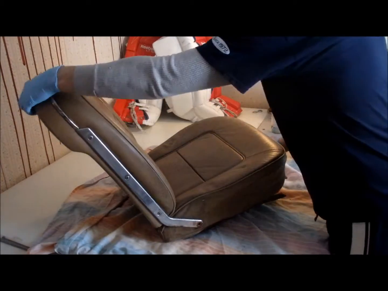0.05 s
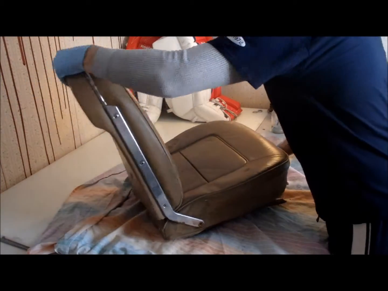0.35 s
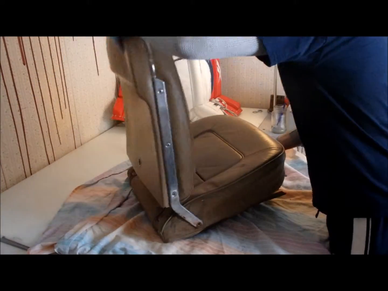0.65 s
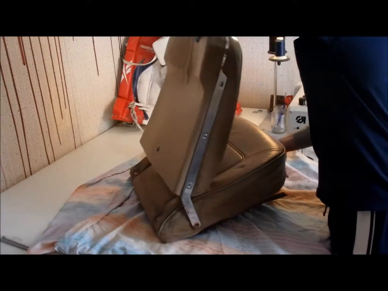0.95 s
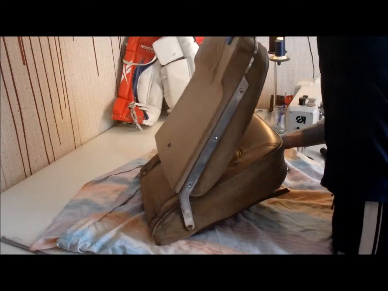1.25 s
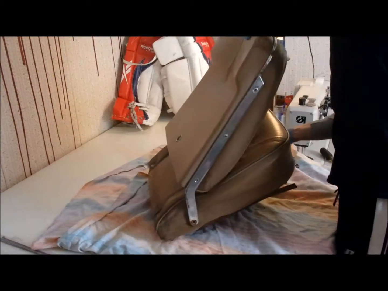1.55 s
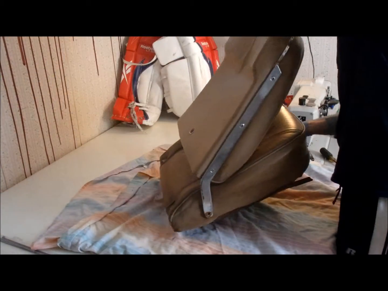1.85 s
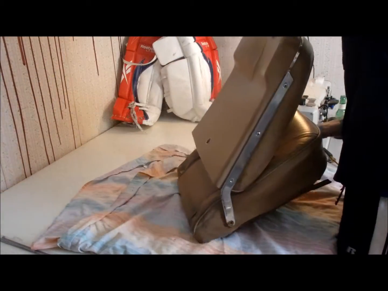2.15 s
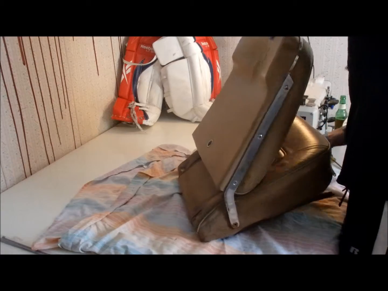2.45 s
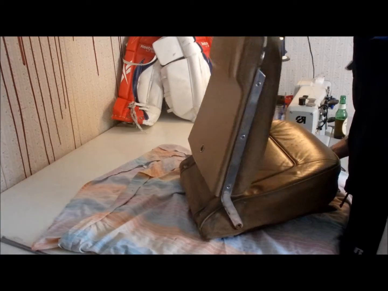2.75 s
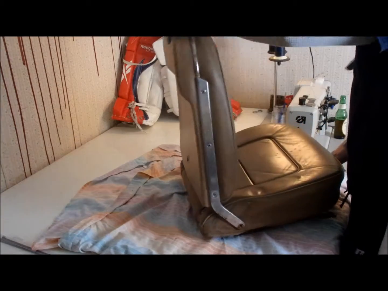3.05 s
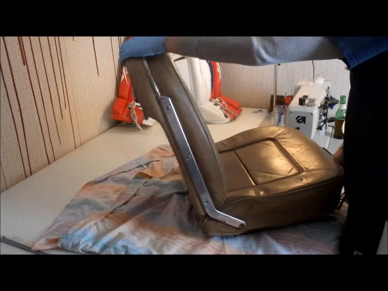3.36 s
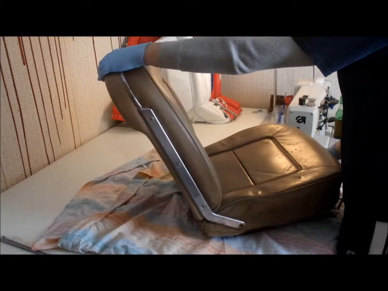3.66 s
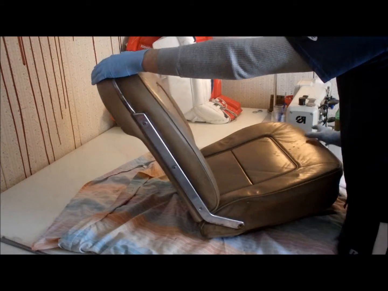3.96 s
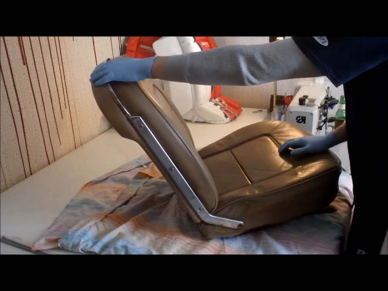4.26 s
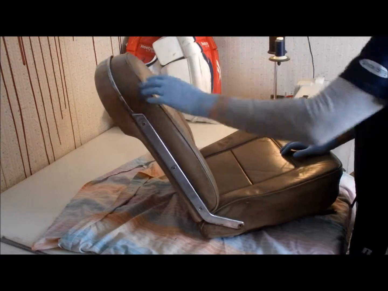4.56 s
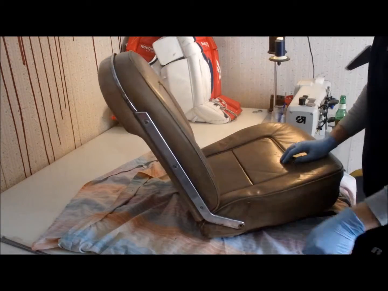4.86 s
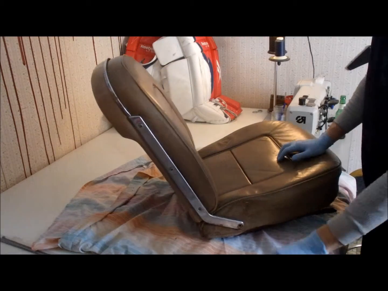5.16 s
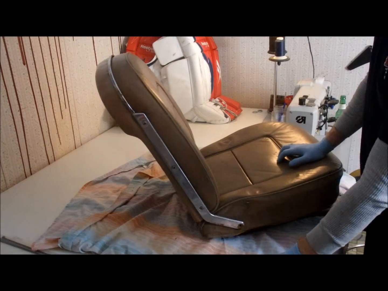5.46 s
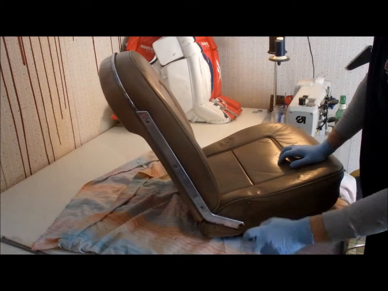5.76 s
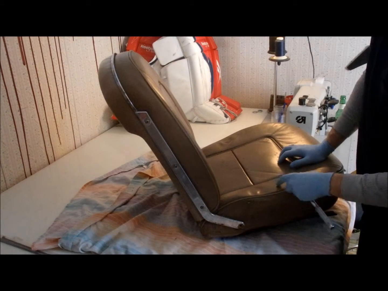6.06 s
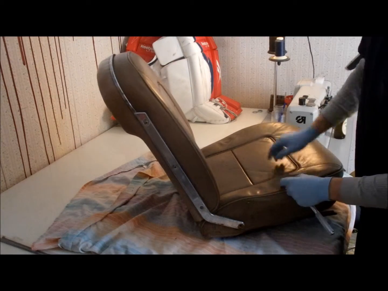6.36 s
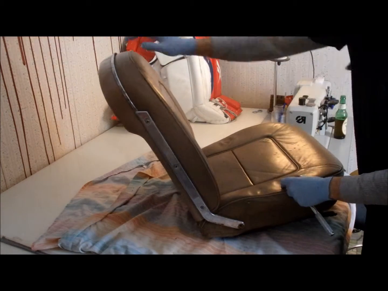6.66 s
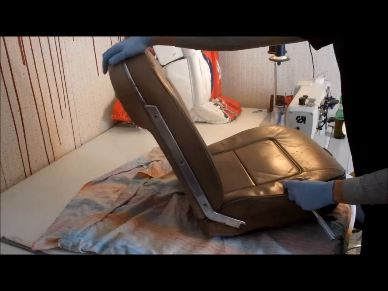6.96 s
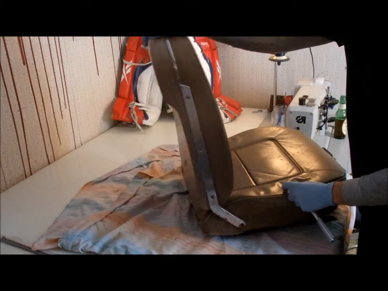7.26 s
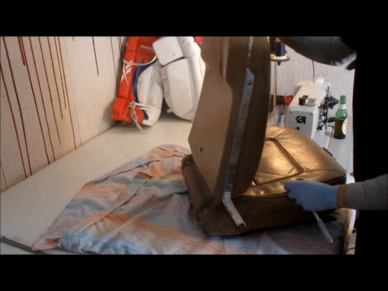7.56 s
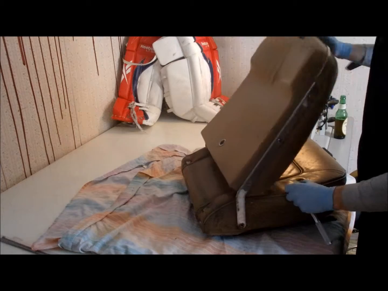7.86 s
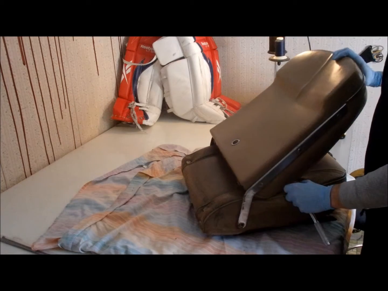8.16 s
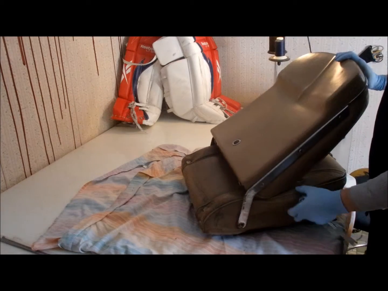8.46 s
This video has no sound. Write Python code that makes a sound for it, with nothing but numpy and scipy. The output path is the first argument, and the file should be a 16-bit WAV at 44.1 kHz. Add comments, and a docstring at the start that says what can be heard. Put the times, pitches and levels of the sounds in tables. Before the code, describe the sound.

Sharp little clicks and fabric rubbing open as a car seat is shifted over a cloth on a workbench. Dull knocks and low booms come as its weight settles. After a quieter stretch with sleeve swishes, a latch snaps brightly, the frame thuds and the upholstery scrapes again. Everything is close and slightly to the right, in a small workshop with light microphone hiss.

```python
"""A small workshop, close to a cloth-covered workbench on which an old car seat is rocked and turned.
Upholstery drags over the cloth and the bench top rumbles and booms under the weight. Fittings click,
the steel frame knocks, the backrest hinge creaks, sleeves swish and the recliner latch snaps over once.
The microphone is a camera's, dull and slightly hissy; the seat is close by, a little louder on the right.
"""
import sys
import numpy as np
from scipy import signal
from scipy.fft import rfft, irfft, next_fast_len
from scipy.io import wavfile
from scipy.ndimage import map_coordinates

SR = 44100
rng = np.random.default_rng(int(sys.argv[2]) if len(sys.argv) > 2 else 0)


def file_out(sig):
    """Save sig as 16-bit WAV at sys.argv[1]."""
    # one column per channel
    cols = np.atleast_2d(sig).T
    # limit, then scale
    lim = np.clip(cols, -1, 1)
    pcm = np.round(lim * 32767).astype(np.int16)
    wavfile.write(sys.argv[1], SR, pcm)


N = 380141


def amp(db):
    """Decibels to gain."""
    return np.exp(np.asarray(db) * (np.log(10) / 20))


def unit(x):
    """Scale to rms 1."""
    return x / np.sqrt(np.mean(x ** 2) + 1e-20)


def along(points, hz):
    """Read (frequency, value) points on a log frequency axis."""
    point_hz, values = np.transpose(points)
    return np.interp(np.log(hz + 1), np.log(point_hz + 1), values)


def wobble(rate):
    """A smooth random curve, rate knots a second."""
    knots = rng.standard_normal(int(N * rate / SR) + 4)
    return map_coordinates(knots, [np.arange(N) * rate / SR])


def filtered(x, response):
    """Multiply the spectrum of x by a function of frequency."""
    n = x.shape[-1]
    padded = next_fast_len(n + 8192)
    return irfft(rfft(x, padded) * response(np.fft.rfftfreq(padded, 1 / SR)), padded)[..., :n]


def coloured(x, spectrum, size=4096):
    """Minimum-phase colouring: nothing sounds before the contact."""
    cepstrum = irfft(np.log(amp(along(spectrum, np.fft.rfftfreq(size, 1 / SR)))))
    cepstrum[1:size // 2] *= 2
    cepstrum[size // 2 + 1:] = 0
    impulse = irfft(np.exp(rfft(cepstrum)))
    return signal.fftconvolve(x, impulse[None], axes=1)[:, :x.shape[1]]


def stereo_noise(n, coherence):
    """White noise with a given likeness of left and right."""
    def mid_side_gains(hz):
        angle = np.arccos(np.clip(along(coherence, hz), -1, 1)) / 2
        return np.array([np.cos(angle), np.sin(angle)])
    mid, side = filtered(rng.standard_normal((2, n)), mid_side_gains)
    return np.array([mid + side, mid - side])


def shaped(noise, spectrum):
    """Shape noise to a spectrum, at rms 1."""
    return unit(filtered(noise, lambda hz: amp(along(spectrum, hz))))


def add(out, start, sound):
    """Mix a sound in at a start time in seconds."""
    rest = out[:, max(round(start * SR), 0):]
    rest[:, :sound.shape[1]] += sound[:, :rest.shape[1]]


# Workshop tone at the microphone, and the high hiss above it: (frequency [Hz], level [dB])
ROOM_TONE = [(15, -60), (25, -34), (313, -4), (456, -7), (647, -4), (721, -7), (824, -8), (1610, -8),
             (1750, -8.5), (2760, -11), (3920, -11.5), (5560, -13), (15400, -30.5)]
HIGH_HISS = [(3000, -13), (6000, -0.5), (9000, 1.5), (12000, 2), (14000, 3), (15500, -3.5)]
# Likeness of the room tone in left and right: (frequency [Hz], coherence [0-1])
ROOM_COHERENCE = [(60, 0.01), (300, 0.64), (1400, 0.15), (6000, 0.97)]
# The high hiss swells and sinks: (time [s], level [dB])
HISS_SWELLS = [(0, -53), (0.14, -51.5), (0.64, -49.5), (0.8, -53), (1.38, -50.5), (1.75, -53),
               (2.54, -51.5), (2.68, -48.5), (2.97, -52.5), (3.35, -51), (4.15, -53), (4.45, -51.5),
               (5.3, -53.5), (5.58, -51.5), (6.9, -53), (7.3, -49.5), (7.65, -52), (8.15, -50),
               (8.5, -52.5)]
def hiss(room_db=-54, shared_db=-5):
    """Steady room tone under the microphone's high hiss, which wavers and is partly alike on both sides."""
    swell_db = np.interp(np.arange(N) / SR, *np.transpose(HISS_SWELLS))
    noise = rng.standard_normal((2, N)) + amp(shared_db) * rng.standard_normal(N)
    room = shaped(stereo_noise(N, ROOM_COHERENCE), ROOM_TONE)
    return amp(room_db) * room + amp(swell_db) * shaped(noise, HIGH_HISS)


# Pushes that drag the seat over the cloth: (start [s], length [s], level [dB])
DRAGS = [(0.06, 0.21, -46.5), (0.346, 0.29, -47.5), (0.717, 0.21, -52), (0.941, 0.73, -45),
         (1.39, 0.093, -37.5), (2.245, 0.14, -45), (2.54, 0.38, -45.5), (2.948, 0.26, -52.5),
         (3.31, 0.32, -49), (3.583, 0.086, -43.5), (4.334, 0.098, -45), (6.985, 0.14, -54.5),
         (7.18, 0.42, -48.5), (7.637, 0.2, -55), (7.865, 0.5, -46.5)]
def pushes(resting_db=-60, build_s=0.067, stop_s=0.069):
    """Strength of the rubbing: each push builds, holds and dies away; the hands are never quite still."""
    power, t = np.zeros((1, N)), np.arange(2 * SR)[None] / SR
    for start, length, db in DRAGS:
        push = amp(db) * np.minimum(t / build_s, 1) * np.exp(-np.maximum(t - length, 0) / stop_s)
        add(power, start, push ** 2)
    return np.sqrt(amp(resting_db) ** 2 + power)


# Likeness of the nearby seat in left and right: (frequency [Hz], coherence [0-1])
SEAT_COHERENCE = [(60, 0.85), (600, 0.99), (2400, 0.95), (4200, 0.13), (7000, 0.17)]
def friction(catches_per_s, catch_share, spread_db):
    """Fibres rub: countless tiny slips, with some larger catches among them."""
    catches = (rng.random(N) < catches_per_s / SR) * rng.choice([-1, 1], N)
    sizes = amp(spread_db * np.minimum(rng.exponential(size=N), 4))
    slips = stereo_noise(N, SEAT_COHERENCE)
    return np.sqrt(1 - catch_share) * slips + np.sqrt(catch_share) * unit(catches * sizes)


# Upholstery on the cloth, close up, its scrape and its lighter swish: (frequency [Hz], level [dB])
SCRAPE = [(100, -36), (250, -11.5), (500, -1), (720, -3.5), (1050, -2.5), (1400, -3), (2000, -2.5),
          (2500, 1), (2850, 1.5), (3200, -12.5), (4500, -7.5), (9000, -26)]
SWISH = [(800, -19), (1800, -36), (2500, -13), (2900, -2), (3200, -5), (3600, 3.5), (4200, 3), (4700, -7),
         (5400, -27), (8000, -21), (15000, -22)]
def upholstery(push, swish_db=-3, judder_db=1):
    """Upholstery scrapes on the bench cloth and fabric swishes; both judder with the hand."""
    judder = amp(judder_db * wobble(35))
    scrape = shaped(friction(catches_per_s=700, catch_share=0.2, spread_db=0), SCRAPE)
    swish = shaped(friction(catches_per_s=580, catch_share=0.13, spread_db=4), SWISH)
    return push * judder * (scrape + amp(swish_db) * swish)


# The bench top under the moving seat: (frequency [Hz], level [dB])
BENCH_RUMBLE = [(20, -22), (45, -11), (65, -6.5), (95, -2), (170, 3), (260, -7), (500, 0.5), (1500, -43)]
# The seat's weight settles on the bench: (time [s], level [dB])
SETTLES = [(1.32, -59), (2.39, -48), (2.491, -43), (2.61, -41.5), (2.77, -66), (3.72, -49), (5.31, -50),
           (6.27, -70), (7.08, -45), (7.209, -34)]
def bench(push, resting_db=-69, drag_db=-15, load_db=-3, boom_db=-5, lumps_db=3):
    """The bench top rumbles in lumps under the dragging seat and booms when the weight settles."""
    boom_hz, boom_t60, rumble_t60 = 64.6, 0.52, 0.22  # the top's lowest mode outlasts the rumble
    t = np.arange(SR)[None] / SR
    load, boom = np.zeros((2, 1, N))
    for start, db in SETTLES:
        press = amp(db) * (1 - np.exp(-t / 0.006))  # the padding takes a moment to give
        add(load, start, press * amp(-60 * t / rumble_t60))
        add(boom, start, press * amp(-60 * t / boom_t60) * np.sin(2 * np.pi * boom_hz * t))
    weight = amp(resting_db) + amp(drag_db) * push + amp(load_db) * load
    lumps = amp(lumps_db * wobble(22))
    rumble = shaped(stereo_noise(N, SEAT_COHERENCE), BENCH_RUMBLE)
    return weight * unit(lumps * rumble) + amp(boom_db) * boom


# Ring of the seat and the small workshop around it: (frequency [Hz], t60 [s])
WORKSHOP_DECAY = [(70, 1), (250, 0.19), (700, 0.25), (1900, 0.21), (4800, 0.16), (10000, 0.22)]
def workshop_ring(n):
    """Diffuse ring of seat and room; each frequency dies at its own speed."""
    hz, t, spectra = signal.stft(stereo_noise(n, SEAT_COHERENCE), SR, nperseg=256)
    decay = amp(-60 * t / along(WORKSHOP_DECAY, hz)[:, None])
    _, ring = signal.istft(spectra * decay, SR, nperseg=256)
    return unit(ring[:, :n])


# Small hard clicks of the fittings: (time [s], level [dB])
CLICKS = [(0.1169, -21), (0.1499, -20.5), (0.183, -20), (0.2324, -35), (0.367, -17.5), (1.2685, -30),
          (1.3221, -25.5), (1.399, -22), (1.5564, -22), (1.783, -31), (2.7206, -29), (2.7441, -20.5),
          (7.032, -28), (7.5575, -32), (7.5853, -40)]
# A click from close by: (frequency [Hz], level [dB])
CLICK_COLOUR = [(100, -36), (500, -11.5), (1500, -11), (2600, -3), (3150, -6.5), (4100, 5.5), (5300, -14),
                (9000, -19), (13000, -31)]
def fitting_clicks(room_db=6, snap_t60=0.0027):
    """A fitting gives a very short snap and the walls answer."""
    out, t = np.zeros((2, N)), np.arange(SR // 4) / SR
    for start, db in CLICKS:
        burst = rng.standard_normal((1, len(t))) * amp(-60 * t / snap_t60)
        snap = unit(coloured(burst, CLICK_COLOUR))
        walls = amp(room_db) * unit(coloured(workshop_ring(len(t)), CLICK_COLOUR))
        add(out, start, amp(db) * (snap + walls) / np.abs(snap).max())
    return out


# Blows on the frame: (time [s], level [dB], weight [dB/octave], hardness [dB/octave])
KNOCKS = [(0.397, -49.5, 2, 3), (0.693, -49, 0.5, 1.5), (0.772, -58, -3, 4.5), (1.285, -58, 7, -6),
          (1.782, -52.5, 0.2, 0.5), (2.399, -58, 2, 1), (2.462, -57.5, 5.5, 5.5), (2.578, -31.5, -5, -1),
          (3.435, -34.5, 1.5, -5.5), (3.686, -44.5, 3, 0.3), (3.96, -48, -1, 1), (4.495, -51, -9, 0.5),
          (5.738, -40.5, -11, -0.8), (6.0542, -32, -8.5, -1.5), (6.058, -23, -14.5, 1.2),
          (6.257, -39, -1, -5), (7.031, -47.5, 3, 0.5), (7.185, -23, -4, -5.5), (8.603, -49.5, 0.5, -2)]
# Modes of the steel frame: (frequency [Hz], level [dB], t60 [s])
FRAME_MODES = [(170, -10, 0.23), (293, -14.5, 0.22), (379.3, -6, 0.26), (448, -1.5, 0.097), (548, -4, 0.11),
               (711, -16, 0.072), (766, -10.5, 0.19), (932, 5, 0.072), (1023, -3.5, 0.21),
               (1097, 7.5, 0.07), (1304, -7.5, 0.15), (1615, -5.5, 0.16), (1717, -9.5, 0.15),
               (1914, 1.5, 0.077), (2280, -9.5, 0.17), (2726, -5.5, 0.085), (2860, -12.5, 0.086),
               (3150, -43, 0.2), (3311, -13, 0.26), (3650, -46, 0.064), (3530, -21, 0.23),
               (3900, -30, 0.15), (4400, -23, 0.12)]
# Dense clatter of pan, springs and bench: (frequency [Hz], level [dB])
CLATTER = [(40, -8.5), (70, -19.5), (400, 0), (700, 2), (1100, 2), (1400, -5.5), (2100, 3.5), (2750, -1),
           (3100, -8.5), (3900, 3.5), (5500, -16.5), (10000, -20)]
# Bands that a blow drives: (low edge [Hz], high edge [Hz])
BLOW_BANDS = [(40, 130), (130, 260), (260, 600), (600, 1400), (1400, 3100), (3100, 6000)]
# An average blow, band by band: (level [dB])
BLOW_DB = [-17.5, -8, -2.6, -2, 1.93, -9.5]
def frame_knocks(modes_db=-2, crack_db=-2, crack_t60=0.034, attack_s=0.00026, pivot_hz=640):
    """Each blow cracks, rings the frame's modes and leaves a clatter in the room."""
    out, t = np.zeros((2, N)), np.arange(SR // 4) / SR
    hz, mode_db, t60 = np.transpose(FRAME_MODES)[:, :, None]
    bands = [signal.butter(4, edges, "band", fs=SR, output="sos") for edges in BLOW_BANDS]
    octaves = np.log2(np.array(BLOW_BANDS) / pivot_hz).mean(axis=1)
    for start, blow_db, weight, hardness in KNOCKS:
        # weight lifts the bass below the pivot, a hard contact the treble above it
        tilt_db = np.abs(octaves) * np.where(octaves < 0, weight, hardness)
        drive_db = blow_db + np.array(BLOW_DB) + tilt_db
        scatter, phase = rng.standard_normal((2, len(FRAME_MODES), 1))
        envelopes = amp(mode_db + 2 * scatter - 60 * t / t60)
        modes = np.sum(envelopes * np.sin(2 * np.pi * (hz * t + phase)), axis=0)
        crack = unit(stereo_noise(len(t), SEAT_COHERENCE) * amp(-60 * t / crack_t60))
        clatter = unit(coloured(workshop_ring(len(t)) + amp(crack_db) * crack, CLATTER))
        blow = (clatter + amp(modes_db) * unit(modes)) * (1 - np.exp(-t / attack_s))
        for band, db in zip(bands, drive_db):
            part = signal.sosfilt(band, blow)
            add(out, start, amp(db) * part / np.std(part[:, :SR // 20]))  # level of the first 50 ms
    return out


# Creaks of the backrest hinge: (start [s], length [s], level [dB])
CREAKS = [(0.51, 0.063, -52.5), (0.66, 0.078, -44.5), (2.051, 0.044, -55.5)]
# Resonance of the hinge: (frequency [Hz], level [dB])
HINGE_COLOUR = [(150, -23), (380, -3), (520, 4), (640, -11), (900, -41), (3000, -55)]
def hinge_creaks(slips_per_s=130, uneven=0.3):
    """The hinge sticks and slips at an uneven rate; each slip rings it."""
    out = np.zeros((2, N))
    for start, length, db in CREAKS:
        n = round(length * SR)
        rate = slips_per_s * np.exp(uneven * wobble(151)[:n])
        slip_count = np.floor(np.cumsum(rate) / SR)
        slips = np.diff(slip_count, prepend=-1) * np.hanning(n)
        add(out, start, amp(db) * unit(coloured(slips[None], HINGE_COLOUR)))
    return out


# Sleeves brush past: (middle [s], length [s], level [dB])
SLEEVE_SWEEPS = [(2.688, 0.12, -43), (4.57, 0.13, -49), (4.93, 0.17, -37.5), (5.5, 0.16, -54.5),
                 (5.97, 0.065, -53.5), (6.557, 0.047, -53), (8.186, 0.2, -47)]
# Sleeve fabric near the microphone: (frequency [Hz], level [dB])
SLEEVE_COLOUR = [(200, -15), (500, -7.5), (1200, -14.5), (2070, -4), (3140, -3), (4200, 1.5), (4800, -5),
                 (5950, -20), (15000, -25)]
def sleeves():
    """Fabric rubs, swelling and fading with each sweep of an arm."""
    t = np.arange(N) / SR
    sweeps = sum(amp(db) * np.exp(-2 * ((t - middle) / length) ** 2)
                 for middle, length, db in SLEEVE_SWEEPS)
    return sweeps * shaped(friction(catches_per_s=450, catch_share=0.1, spread_db=6), SLEEVE_COLOUR)


# Modes of the recliner latch: (frequency [Hz], level [dB], t60 [s])
LATCH_MODES = [(292, -4, 0.23), (323, -11, 0.33), (523, 2.5, 0.23), (813, -2, 0.24), (1050, -11, 0.13),
               (2150, 11, 0.078), (2705, 19, 0.049)]
def latch(start_s=6.058, ring_db=-24, attack_s=0.0015, snap_db=-27, snap_t60=0.013):
    """The latch snaps over brightly and rings hollow above the clank of the frame."""
    out, t = np.zeros((2, N)), np.arange(SR // 4) / SR
    ring = sum(amp(db + ring_db - 60 * t / t60) * np.cos(2 * np.pi * hz * t)
               for hz, db, t60 in LATCH_MODES)
    snap = amp(snap_db - 60 * t / snap_t60) * rng.standard_normal((2, len(t)))
    add(out, start_s, (ring + snap) * (1 - np.exp(-t / attack_s)))
    return out


# Balance of the seat at the microphone: (frequency [Hz], left minus right [dB])
BALANCE = [(60, -2), (700, -3.5), (2500, -4.5), (4400, 0.5), (8000, 10), (15000, 0)]
def at_microphone(seat, left_lead_s=0.000035):
    """The left port hears first; lows and mids are louder on the right, the high treble on the left."""
    sides = np.array([[.5], [-.5]])
    def response(hz):
        return amp(sides * along(BALANCE, hz)) * np.exp(2j * np.pi * hz * sides * left_lead_s)
    return filtered(seat, response)


def scene():
    """The seat is heard close by, a little louder on the right, over the hiss."""
    push = pushes()
    metal = fitting_clicks() + frame_knocks() + hinge_creaks() + latch()
    seat = upholstery(push) + bench(push) + metal + sleeves()
    return hiss() + at_microphone(seat)


def record(dry, top_hz=15600):
    """The camera clips at full scale and keeps nothing above its band limit."""
    return filtered(np.clip(dry, -1, 1), lambda hz: hz < top_hz)


dry = scene()
out = record(dry)
file_out(out)
```